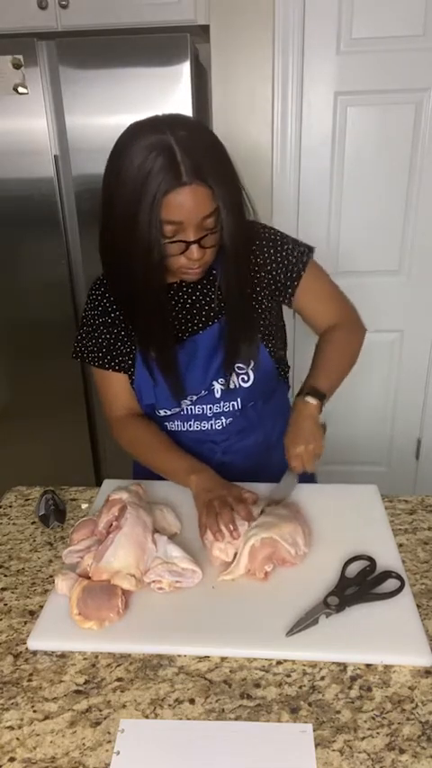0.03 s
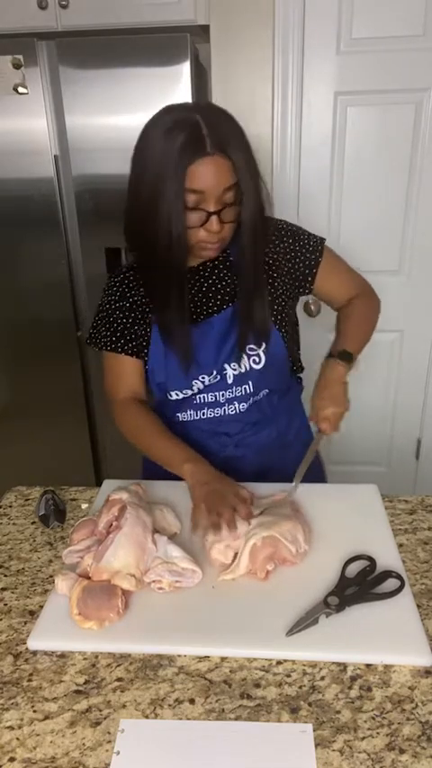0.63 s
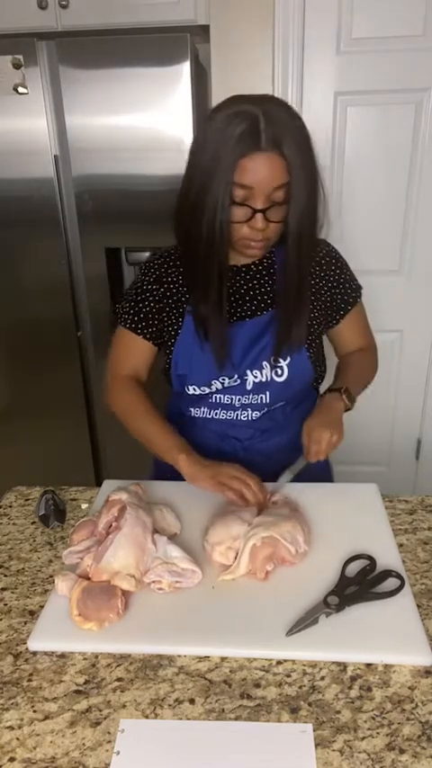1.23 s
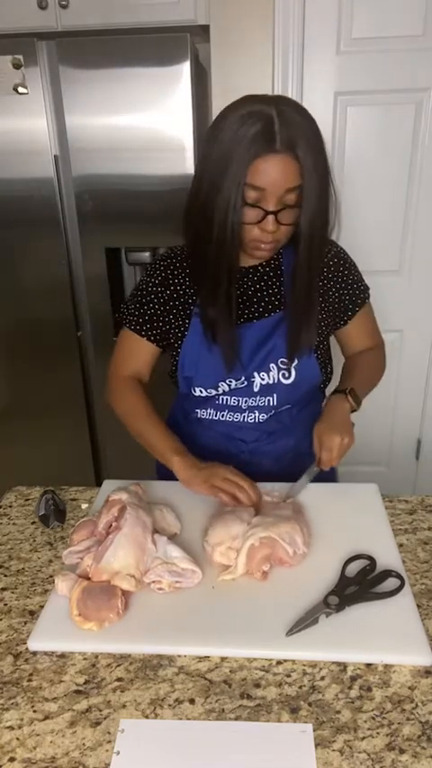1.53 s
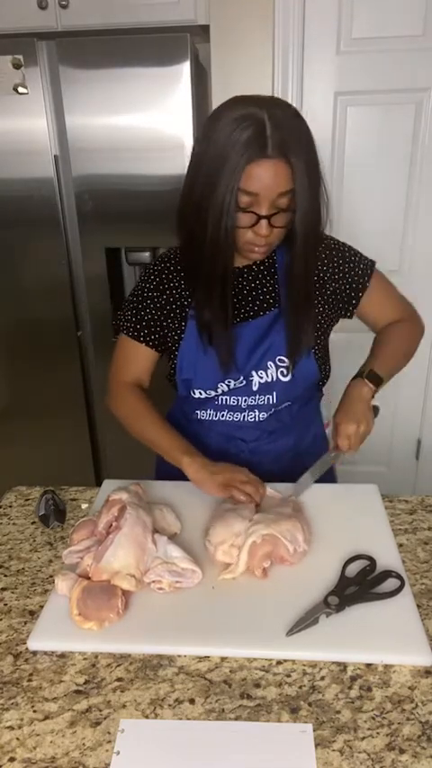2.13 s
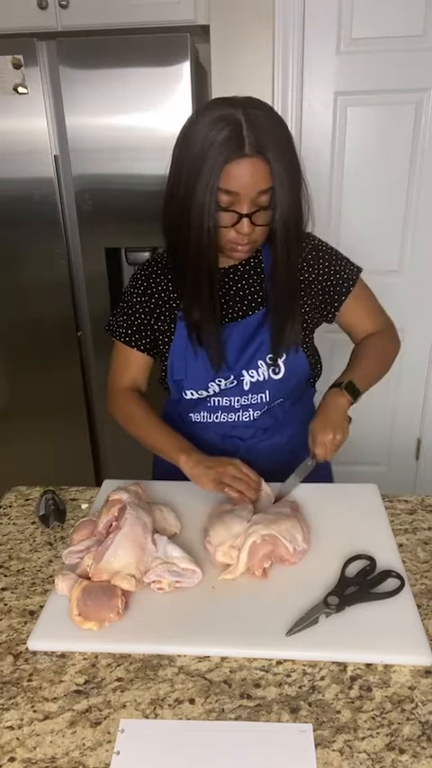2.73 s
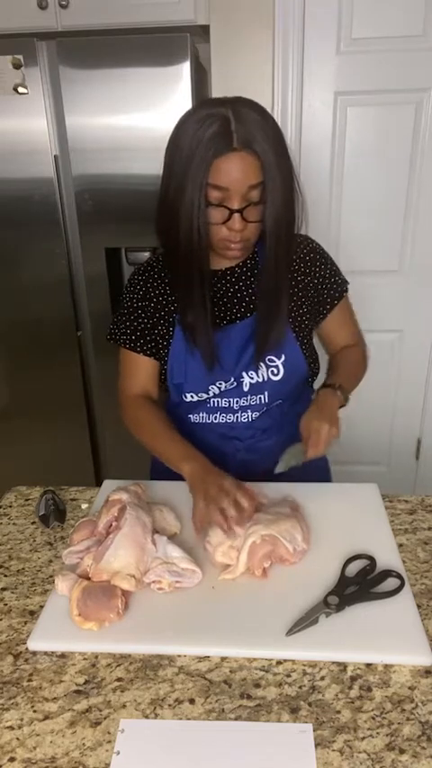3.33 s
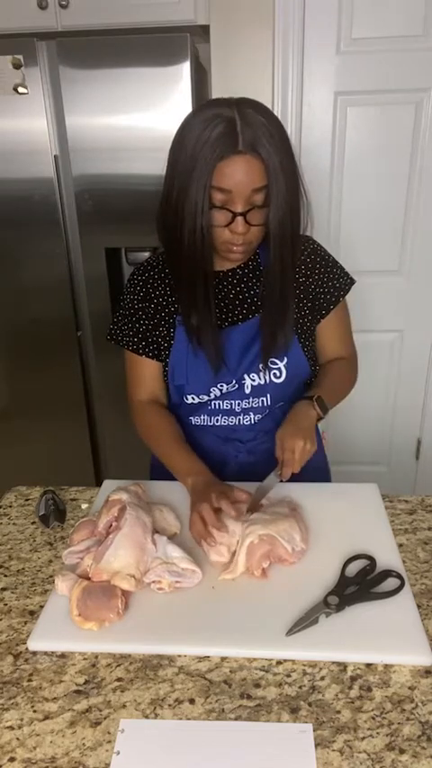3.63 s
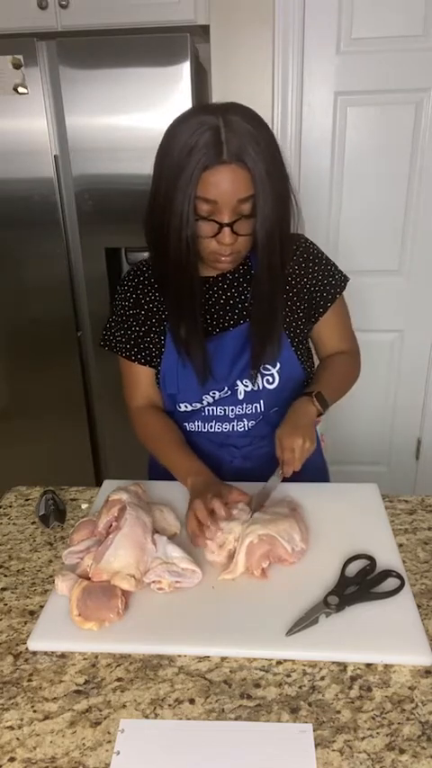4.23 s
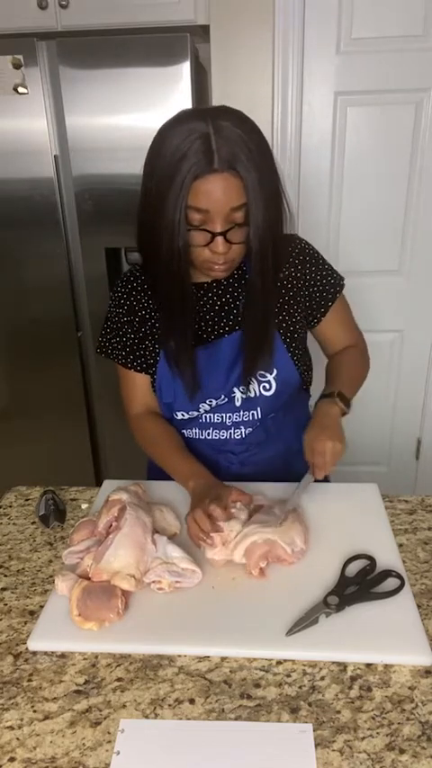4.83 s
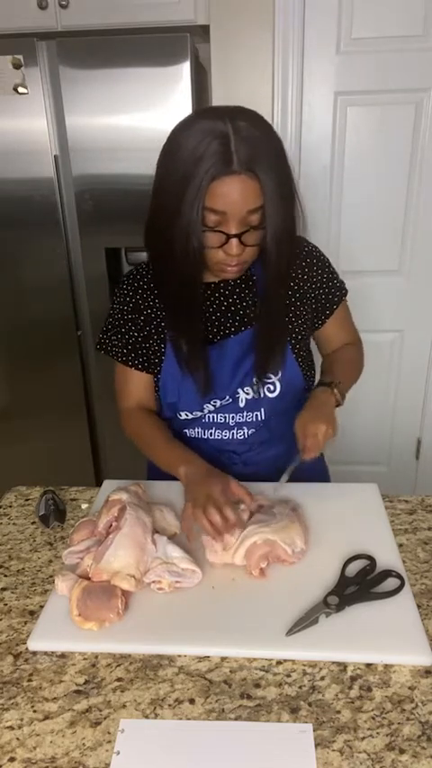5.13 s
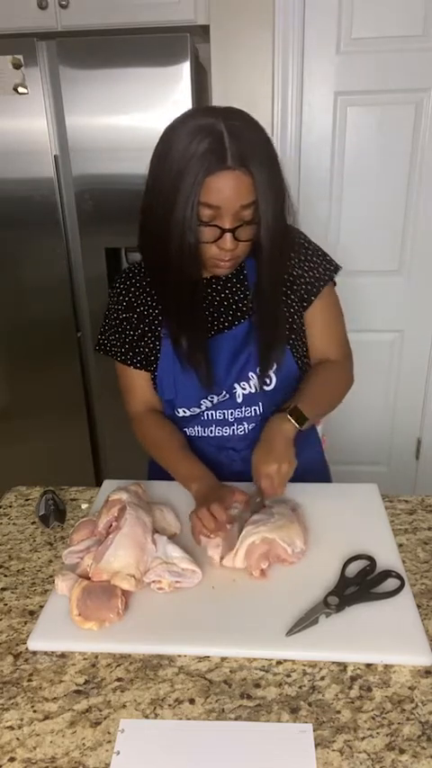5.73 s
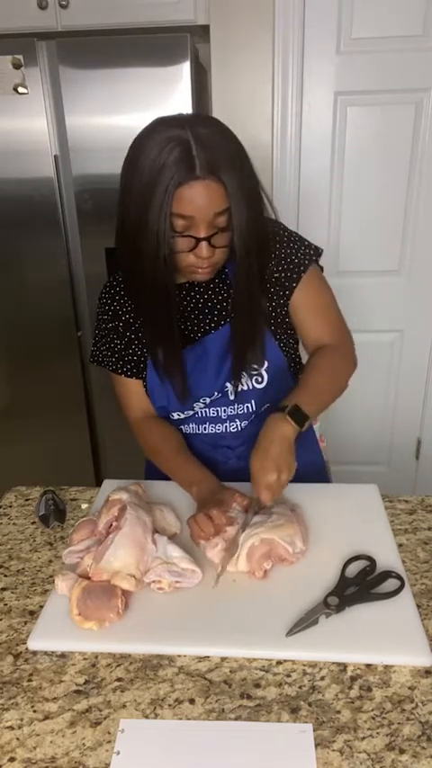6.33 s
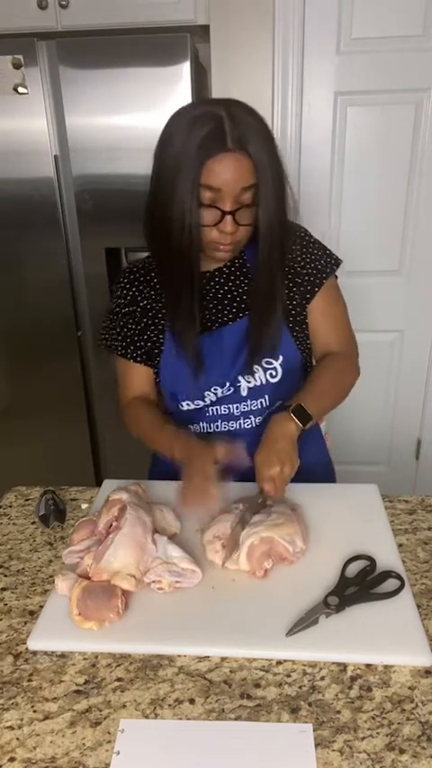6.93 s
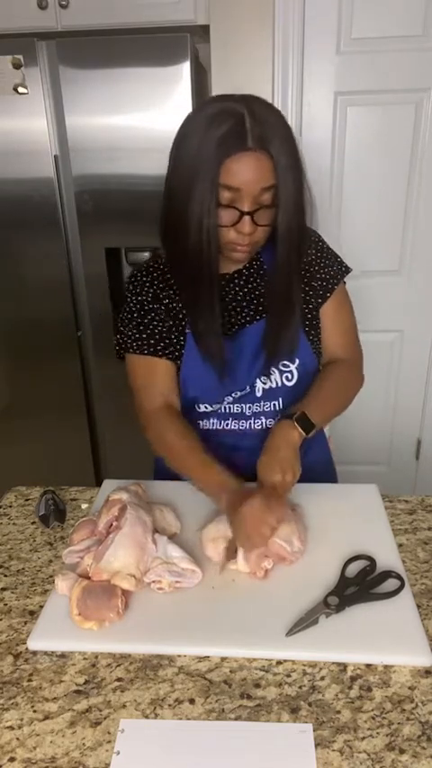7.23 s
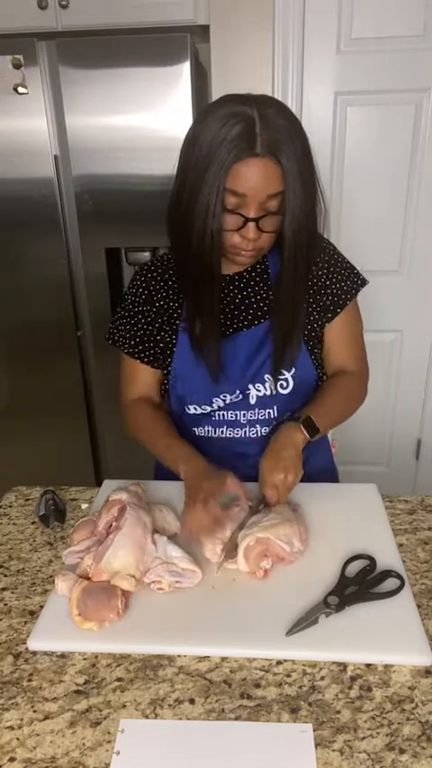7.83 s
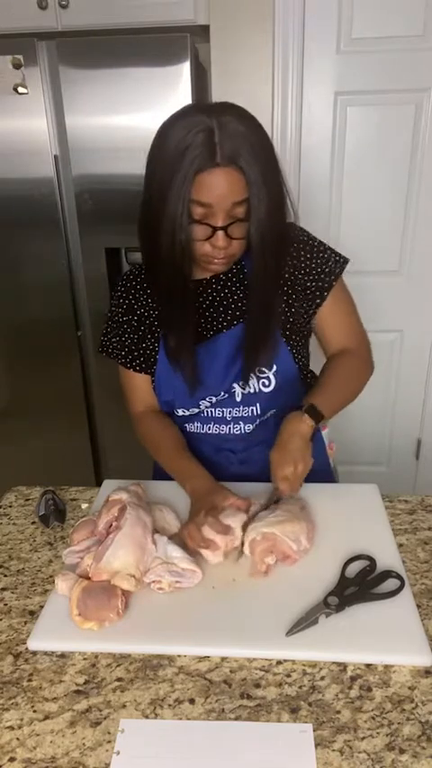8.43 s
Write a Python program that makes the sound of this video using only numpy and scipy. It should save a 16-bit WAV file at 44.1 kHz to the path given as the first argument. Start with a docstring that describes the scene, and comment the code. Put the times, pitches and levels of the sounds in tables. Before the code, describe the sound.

A knife saws softly through raw chicken and knocks on a plastic cutting board, with small wet ticks and squelches. After a cluster of taps, the blade snaps through a joint with one loud chop. Following a quieter stretch, the knocking resumes, a hand slaps the wet meat, and the sawing returns. A fridge hums faintly in the slightly echoing kitchen.

```python
"""A knife cuts up raw chicken on a plastic board on a stone counter. It saws through skin and gristle,
knocks and skids on the board, rings against bone and once snaps through a joint onto the board.
The wet meat ticks and squelches as films snap and bubbles burst; it is shoved and a flat hand slaps it,
so the counter thuds. A fridge hums in the hard-walled kitchen."""
import sys
import numpy as np
from scipy import signal
from scipy.fft import rfft, irfft, next_fast_len
from scipy.io import wavfile

SR = 44100
rng = np.random.default_rng(int(sys.argv[2]) if len(sys.argv) > 2 else 0)


def to_wav(s):
    """Save 16-bit WAV."""
    ch = np.atleast_2d(s).T  # columns
    pcm = np.round(np.clip(ch, -1, 1) * 32767)  # PCM
    wavfile.write(sys.argv[1], SR, pcm.astype(np.int16))


N = 382788
TIME = np.arange(N) / SR
SLAP_S, CUTOFF_HZ = 7.1702, 15900

# spectra (frequency [Hz], relative density [dB])
AIR_SPECTRUM = [(15, -43), (25, -18.5), (59, 0.5), (169, -12), (233, -7.5), (331, -14.5), (359, -3),
                (433, -10.5), (666, -18), (1170, -24), (2170, -30), (2560, -30), (4150, -32), (11500, -38),
                (15500, -45)]  # air and fridge
SAW_SPECTRUM = [(200, -28), (420, -10.5), (680, -4.5), (820, 4), (1000, -11), (1250, -11.5), (1550, -5.5),
                (2050, -3.5), (2450, -7), (2850, -12), (4000, -14.5), (8000, -32), (12000, -33.5)]
SQUELCH_SPECTRUM = [(1500, 4.5), (3000, -2.5), (5000, -4), (8000, -4), (12500, -5), (14000, -9),
                    (15800, -36)]
KNOCK_SPECTRUM = [(120, -32.5), (250, -16), (400, -3.5), (560, 3.5), (680, 6), (820, 6), (1000, -4.5),
                  (1300, -3.5), (1700, -4.5), (2100, -16.5), (2900, -17.5), (4500, -26.5), (12000, -44),
                  (16000, -52)]
SKID_SPECTRUM = [(200, -22), (400, -5.5), (560, -4), (700, 0.5), (830, 6.5), (1100, -2), (1550, -3),
                 (1800, -7), (2150, -5), (2600, -14.5), (4500, -19), (12000, -38)]
CHOP_SPECTRUM = [(90, -42.5), (150, -27.5), (350, -21), (600, -3.5), (800, -1.5), (1250, -14),
                 (1850, -11.5), (2650, -10.5), (3500, -28.5), (4200, -28.5), (5300, -42), (6200, -29.5),
                 (8000, -42), (15000, -51.5)]
SLAP_SPECTRUM = [(60, -6), (125, -0.5), (190, 0), (280, -5), (480, -4), (800, 1.5), (1060, -5.5),
                 (1550, -5.5), (2400, -8), (3400, -4), (4100, -1.5), (4750, -9.5), (6500, -1.5),
                 (12500, -5), (15500, -17)]
# fridge casing resonances (frequency [Hz], width [Hz], level [dB])
FRIDGE_BANDS = [(65, 30, -71), (368, 110, -65.5), (422, 12, -71)]
# modes (frequency [Hz], level [dB], T60 [s])
BOARD_MODES = [(466.6, -5, 0.2), (561, -2.5, 0.59), (603, 0, .48), (680, -3, 0.14), (792, 3.5, 0.33),
               (874, -13.5, 0.45), (994, -8, 0.61), (905, -8.5, .5), (1070, 1, 0.17), (1535, -6.5, 0.72),
               (1430, -8.5, .45), (1800, -7.5, .45), (1806, 0.5, .4), (2000, -10, 0.69), (2193, -9.5, 0.19),
               (2350, -11.5, 0.44), (2420, -3, 0.16), (2650, -11.5, 0.31)]  # board with counter
COUNTER_MODES = [(44.3, -44, 0.81), (76, -40.5, .55), (102.4, -35.5, 0.7), (143, -41.5, .4)]
KNIFE_MODES = [(1870, -26, .035), (2100, -31, 0.046), (2570, -36.5, 0.028), (3190, -34.5, 0.041),
               (4000, -47.5, .015)]  # whole knife
BLADE_MODES = [(3776, -59, 0.36), (4613, -63.5, 0.13), (5730, -58, 0.075), (8600, -63, 0.2),
               (10200, -57, 0.082), (10510, -75, 0.27), (11860, -67.5, .3)]
# pushes (peak time [s], level [dB], rise [s])
SAW_STROKES = [(0.005, -51, 0.047), (0.11, -59, 0.049), (0.215, -48, 0.029), (0.36, -63, 0.11),
               (0.547, -53.5, 0.029), (2.01, -65.5, 0.14), (2.1, -51, 0.018), (6.415, -49, .016),
               (6.565, -60.5, 0.049), (6.76, -67, 0.089), (8.06, -55.5, 0.066), (8.275, -47.5, 0.073),
               (8.45, -52.5, 0.057), (8.655, -46.5, 0.082)]  # edge through gristle and along the board
FINGER_SQUEEZES = [(0.65, -62, 0.084), (1.43, -61, .04), (1.63, -57, 0.021), (1.9, -64.5, 0.059),
                   (2.12, -57, .1), (4.73, -66, .05), (5.6, -59, 0.12), (5.95, -61, .035),
                   (6.12, -63, 0.06), (6.275, -59.5, 0.06), (6.44, -54.5, 0.012), (6.85, -62, 0.11),
                   (7.98, -58.5, 0.075), (8.07, -43.5, 0.021), (8.21, -49.5, 0.03)]
# knife on board (time [s], level [dB], hardness [dB/octave])
BOARD_KNOCKS = [(0.122, -48, 7), (0.2045, -26, -7.5), (0.71, -43.5, 0), (0.958, -47, -12.5),
                (1.053, -51.5, -3.5), (1.31, -61, 0), (1.525, -55, -11), (1.727, -59, 5.5),
                (1.796, -54.5, -2), (1.962, -49, 6.5), (2.056, -37, 4), (2.079, -30.5, 0), (2.109, -37, 9),
                (2.125, -41, 7.5), (2.369, -33, 2), (3.098, -39, 1.5), (3.439, -55, 12),
                (3.484, -57.5, 4.5), (5.876, -49, 0), (5.897, -35, -3.5), (5.99, -32.5, -3.5),
                (6.069, -42, 2.5), (6.197, -42, 2), (6.209, -38, -2.5), (6.328, -43, -8), (6.389, -40.5, 2),
                (6.542, -39.5, -3), (6.558, -32, 0), (7.685, -48, -3), (7.845, -58.5, 7), (8.018, -43, 1.5),
                (8.088, -28.5, -4.5)]
# wet skin parts from blade and fingers (time [s], level [dB], pitch [Hz], width [Hz])
SKIN_TICKS = [(1.42, -42, 9700, 3500), (1.628, -43, 7100, 5960), (1.728, -47, 13500, 2035),
              (1.851, -44, 8250, 5000), (1.947, -42, 9800, 3000), (2.08, -43.5, 7000, 5030),
              (2.129, -37, 6600, 4000), (2.884, -39, 5880, 2560), (3.637, -44.5, 8930, 4940),
              (3.803, -46, 10020, 4000), (4.723, -44, 11530, 3044), (5.628, -21.5, 12940, 3530),
              (6.2, -39.5, 5700, 810), (6.416, -42.5, 3250, 390), (6.452, -37.5, 4560, 910),
              (6.623, -43.5, 7300, 923), (6.806, -46, 13100, 3020), (6.881, -45, 7060, 1013),
              (7.163, -32.5, 9100, 4320), (7.908, -42, 8070, 4000), (8.191, -29.5, 6500, 4470),
              (8.45, -37.5, 10900, 2480)]
# meat shoved on the board (time [s], level against the slap's thud [dB])
MEAT_SHOVES = [(0.664, -16.5), (1.308, -12.5), (1.375, -18), (2.378, -13), (2.633, -8), (3.152, -17.5),
               (5.99, -25), (6.551, -20), (7.7, -19), (8.09, -22)]
# blade through a joint, then board bounces (time [s], level [dB])
CHOP_HITS = [(2.6220, 3), (2.6264, -7.5), (2.6286, -6.5), (2.6350, -13.5)]
# kitchen decay (frequency [Hz], T60 [s])
KITCHEN_T60 = [(100, 0.57), (600, 0.55), (2500, .62), (5000, 0.6), (9000, .42), (15000, 0.29)]


def from_db(db):
    """Decibels to gain."""
    return 10 ** (np.asarray(db) / 20)


def rms_one(x):
    """Scale to rms 1."""
    return x / np.sqrt(np.mean(x ** 2) + 1e-20)


def at_hz(points, hz):
    """Interpolate a table over log frequency."""
    f, value = np.transpose(points)
    return np.interp(np.log(np.maximum(hz, 1)), np.log(f), value)


def add(out, time_s, sound):
    """Mix a sound in at time_s."""
    start = int(round(time_s * SR))
    out[start:start + len(sound)] += sound[:N - start]


def strokes(rows, release_share=0.63):
    """Gain of pushes that swell and release."""
    gain = np.zeros(N)
    for time_s, db, rise_s in rows:
        width_s = np.where(TIME < time_s, rise_s, release_share * rise_s)
        gain += from_db(db) * np.exp(-((TIME - time_s) / width_s) ** 2)
    return gain


def coloured(x, spectrum):
    """Filter by a spectrum; rms 1."""
    size = next_fast_len(N)
    gain = from_db(at_hz(spectrum, np.fft.rfftfreq(size, 1 / SR)))
    return rms_one(irfft(rfft(x, size) * gain, size)[:N])


def impact(spectrum, tilt_db=0, spread_s=0, size=4096):
    """Causal pulse, peak 1. Bending waves bring treble first, 1 kHz after spread_s."""
    hz = np.fft.rfftfreq(size, 1 / SR)
    octaves = np.log2(np.clip(hz, 200, 4000) / 1000)
    cepstrum = irfft(np.log(from_db(at_hz(spectrum, hz) + tilt_db * octaves)))
    cepstrum[1:size // 2] *= 2  # fold to minimum phase
    cepstrum[size // 2 + 1:] = 0
    lag_rad = 4 * np.pi * spread_s * np.sqrt(1000 * hz)
    pulse = irfft(np.exp(rfft(cepstrum) - 1j * lag_rad))[:size // 2]
    return pulse / np.abs(pulse).max()


def ringing(modes):
    """Decaying sines of alternating sign, 1 s."""
    t = TIME[:SR]
    return sum((-1) ** k * from_db(db - 60 * t / t60_s) * np.sin(2 * np.pi * hz * t)
               for k, (hz, db, t60_s) in enumerate(modes))


def resonance(x, hz, width_hz):
    """Two-pole band-pass."""
    r = np.exp(-np.pi * width_hz / SR)
    return signal.lfilter([1, 0, -1], [1, -2 * r * np.cos(2 * np.pi * hz / SR), r * r], x)


def burst(decay_s, size=2048):
    """Dying spray of tiny contacts, whitened; energy 1."""
    spray, fade = rng.standard_normal(size), np.exp(-TIME[:size] / decay_s)
    for _ in range(3):
        phase_rad = np.angle(rfft(spray * np.sqrt(fade)))
        spray = irfft(np.exp(1j * phase_rad))
    return spray * fade / np.linalg.norm(spray * fade)


def grains(per_s, spread_db):
    """Random clicks of uneven size."""
    sizes = from_db(spread_db * np.minimum(rng.exponential(1, N), 4))
    return (rng.random(N) < per_s / SR) * sizes * rng.choice([-1, 1], N)


def fridge_and_air(fridge_db, air_db):
    """The fridge casing drones over steady air noise."""
    drone = sum(from_db(db) * rms_one(resonance(rng.standard_normal(N), hz, width_hz))
                for hz, width_hz, db in FRIDGE_BANDS)
    drone = signal.sosfilt(signal.butter(4, 520, fs=SR, output="sos"), drone)
    air = coloured(rng.standard_normal(N), AIR_SPECTRUM)
    return from_db(air_db) * air + from_db(fridge_db) * drone


def sawing(gain_db):
    """Fibres tear densely under the edge."""
    tearing = coloured(grains(per_s=3500, spread_db=2.5), SAW_SPECTRUM)
    return from_db(gain_db) * strokes(SAW_STROKES) * tearing


def squelch(gain_db, blade_db):
    """Blade and fingers press out juice; tiny bubbles burst at many pitches."""
    bubbles = sum(resonance(grains(per_s=260, spread_db=3.5), hz, width_hz=700)
                  for hz in np.linspace(3000, 15000, 12))
    pressure = from_db(blade_db) * strokes(SAW_STROKES) + strokes(FINGER_SQUEEZES)
    return from_db(gain_db) * pressure * coloured(bubbles, SQUELCH_SPECTRUM)


def knocks(gain_db, ring_db, skid_s, grip_s, bite_db, skid_per_db):
    """Knife on board: cushioning meat dulls the knock; firm blows bite, light ones skid."""
    out, ring, board = np.zeros(N), np.zeros(N), ringing(BOARD_MODES)
    for time_s, db, hardness_db in BOARD_KNOCKS:
        pulse = from_db(db + gain_db) * impact(KNOCK_SPECTRUM, hardness_db, spread_s=0.0017)
        skid = signal.fftconvolve(impact(SKID_SPECTRUM, hardness_db / 2), burst(skid_s))
        skid *= 1 - np.exp(-TIME[:len(skid)] / grip_s)
        skid *= np.linalg.norm(pulse) / np.linalg.norm(skid)
        add(out, time_s, pulse)
        add(out, time_s, from_db(skid_per_db * (bite_db - db)) * skid)
        add(ring, time_s, from_db(db + ring_db) * board)
    return out, ring


def faint_ticks(per_s=4, db=-55, spread_db=3, hz=10000, spread_octaves=0.3, width_hz=3200):
    """Tick rows scattered in time, level and pitch."""
    count = int(per_s * TIME[-1])
    times_s = (np.arange(count) + rng.random(count)) * TIME[-1] / count
    return [(time_s, db + spread_db * size, min(hz * 2 ** (spread_octaves * pitch), CUTOFF_HZ), width_hz)
            for time_s, (size, pitch) in zip(times_s, rng.standard_normal((count, 2)))]


def ticks(gain_db):
    """Wet films snap; a trapped bubble pitches each click."""
    out = np.zeros(N)
    for time_s, db, hz, width_hz in SKIN_TICKS + faint_ticks():
        snap = resonance(burst(decay_s=0.002), hz, width_hz)
        snap = resonance(snap, hz, 2 * width_hz)
        add(out, time_s, from_db(db + gain_db) * snap / np.abs(snap).max())
    return out


def counter_thuds():
    """The counter thuds under each shove and the slap."""
    out, thud = np.zeros(N), ringing(COUNTER_MODES)
    for time_s, db in MEAT_SHOVES:
        add(out, time_s, from_db(db) * thud)
    add(out, SLAP_S, thud)
    return out


def knife_on_bone(snap_s, ping_s, chatter_db):
    """The knife snaps through gristle, ringing and chattering; later the blade pings on a bone."""
    out, ring = np.zeros(N), ringing(KNIFE_MODES)
    add(out, snap_s, ring)
    add(out, snap_s, from_db(chatter_db) * signal.fftconvolve(ring, burst(decay_s=0.025)))
    add(out, ping_s, ringing(BLADE_MODES))
    return out


def chop(ring_db, crack_db):
    """The blade breaks a joint and lands with a crack; the board bounces and rings."""
    out, ring = np.zeros(N), np.zeros(N)
    pulse = impact(CHOP_SPECTRUM, tilt_db=0.8, spread_s=0.0014)
    for time_s, db in CHOP_HITS:
        add(out, time_s, from_db(db) * pulse)
    landing_s = CHOP_HITS[0][0]
    add(out, landing_s, from_db(crack_db) * burst(decay_s=0.001))
    add(ring, landing_s, from_db(ring_db) * ringing(BOARD_MODES))
    return out, ring


def slap(energy_db, splash_db):
    """The palm expels air and water within milliseconds; a splash follows."""
    out = np.zeros(N)
    outflow = burst(decay_s=0.0038) + from_db(splash_db) * burst(decay_s=0.079)
    smack = signal.fftconvolve(impact(SLAP_SPECTRUM), outflow)
    add(out, SLAP_S, from_db(energy_db) * smack / np.linalg.norm(smack))
    return out


def kitchen(x, wet_db, build_s, treble_db):
    """Diffuse echoes build up fast and decay band by band."""
    t, tail = TIME[:SR], 0
    hz = np.fft.rfftfreq(SR, 1 / SR)
    white = rfft(rng.standard_normal(SR))
    edges_hz = np.geomspace(60, 17000, 41)
    for low_hz, high_hz in zip(edges_hz, edges_hz[1:]):
        centre_hz = np.sqrt(low_hz * high_hz)
        band = irfft(white * ((hz >= low_hz) & (hz < high_hz)), SR)
        band *= from_db(-60 * t / at_hz(KITCHEN_T60, centre_hz)) * (1 - np.exp(-t / build_s))
        share = np.sqrt(2 * (high_hz - low_hz) / SR) * from_db(treble_db * centre_hz / CUTOFF_HZ)
        tail = tail + share * band / np.linalg.norm(band)
    return from_db(wet_db) * signal.fftconvolve(x, tail)[:N]


def scene():
    """Chop and slap fill the room; hands and meat partly shield the small work, the buried knife most."""
    blow, blow_ring = chop(ring_db=-25, crack_db=-22.5)
    taps, tap_ring = knocks(gain_db=1, ring_db=-29.5, skid_s=0.012, grip_s=0.0058,
                            bite_db=-36.5, skid_per_db=0.5653)
    loud = blow + slap(energy_db=11, splash_db=-12.5)
    small = taps + ticks(gain_db=-1) + sawing(gain_db=3) + squelch(gain_db=-3.5, blade_db=-4.5)
    knife = knife_on_bone(snap_s=2.125, ping_s=3.637, chatter_db=-5)
    to_walls = loud + from_db(-1) * small + from_db(-7.5) * knife
    room = kitchen(to_walls, wet_db=2.5, build_s=0.0013, treble_db=-10)
    direct = loud + small + knife + blow_ring + tap_ring + counter_thuds()
    return (direct + room + fridge_and_air(fridge_db=0.5, air_db=-57.5))[None]


def record(dry):
    """Microphone: low cut, soft clip, high cut."""
    thin = signal.sosfilt(signal.butter(2, 32, "high", fs=SR, output="sos"), dry)
    return signal.sosfilt(signal.ellip(10, 0.1, 80, CUTOFF_HZ, fs=SR, output="sos"), np.tanh(thin))


dry = scene()
out = record(dry)
to_wav(out)
```